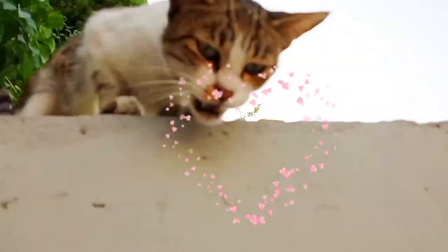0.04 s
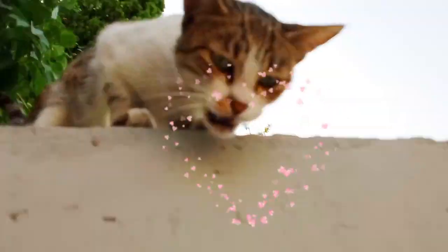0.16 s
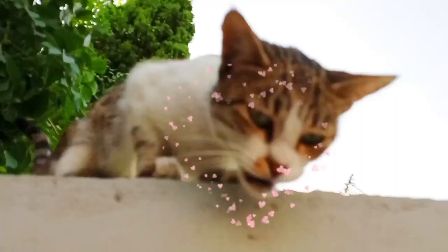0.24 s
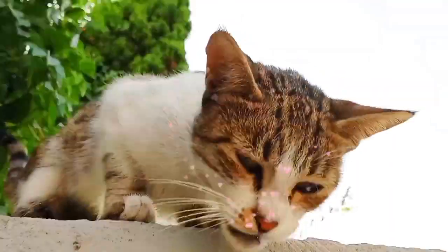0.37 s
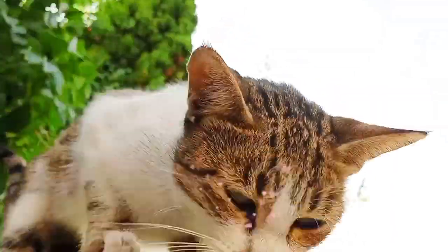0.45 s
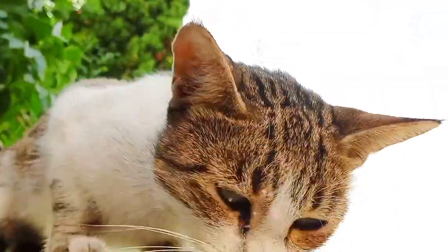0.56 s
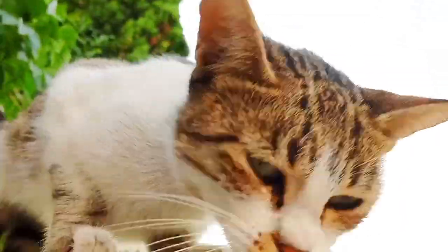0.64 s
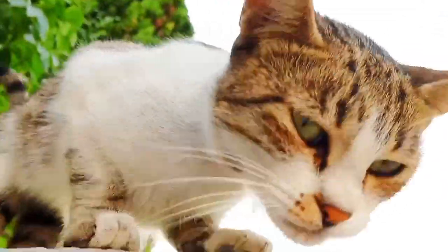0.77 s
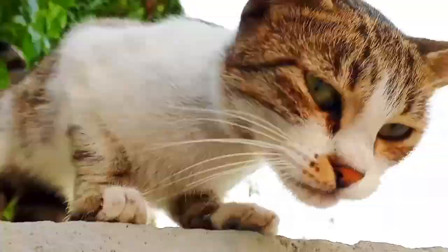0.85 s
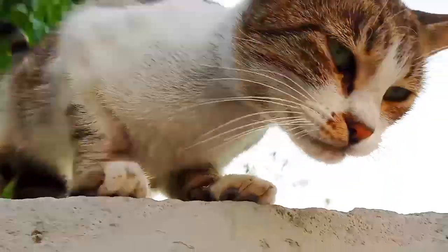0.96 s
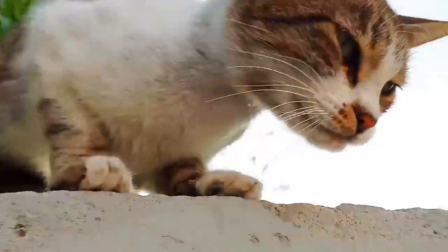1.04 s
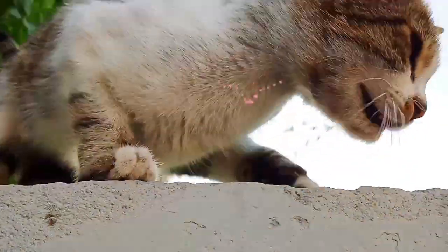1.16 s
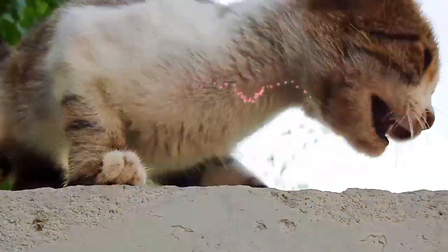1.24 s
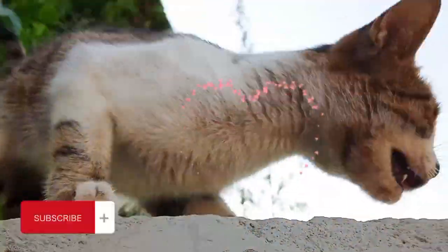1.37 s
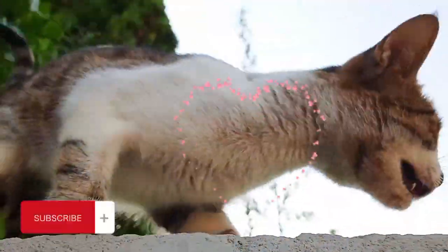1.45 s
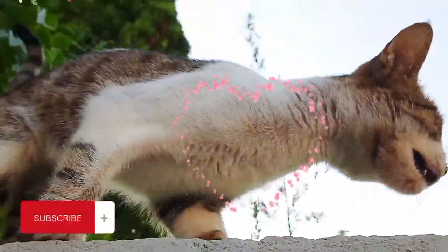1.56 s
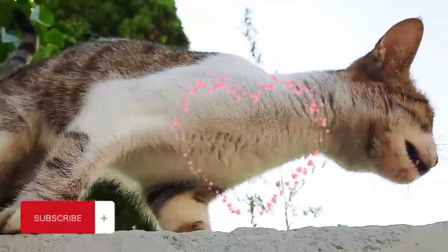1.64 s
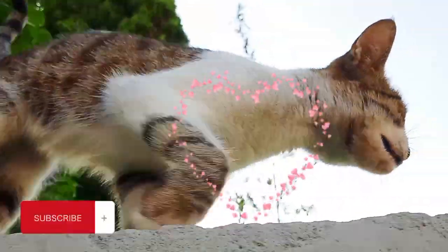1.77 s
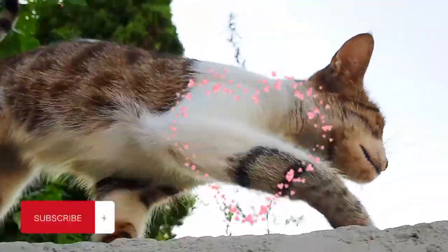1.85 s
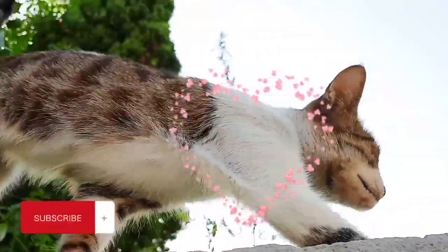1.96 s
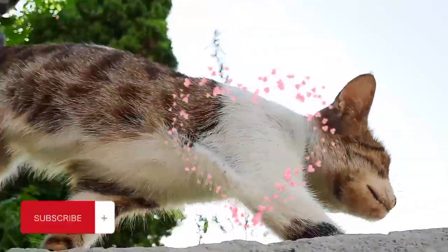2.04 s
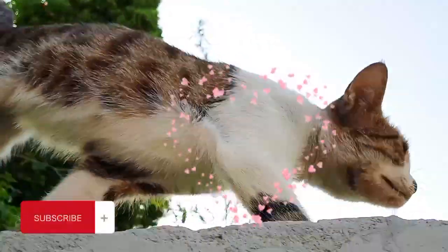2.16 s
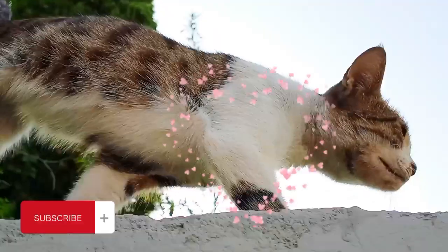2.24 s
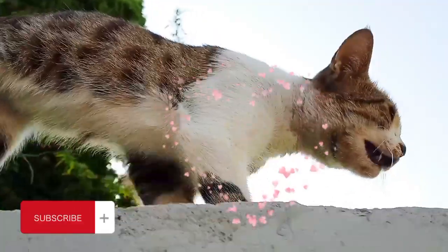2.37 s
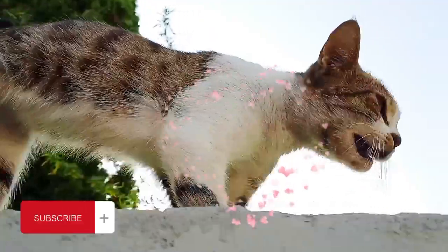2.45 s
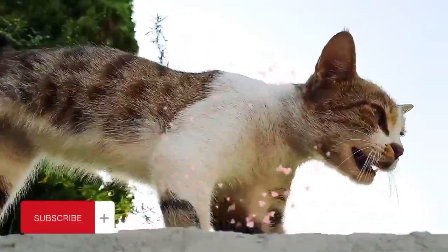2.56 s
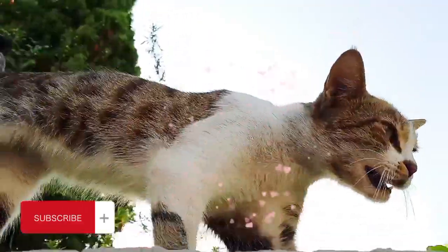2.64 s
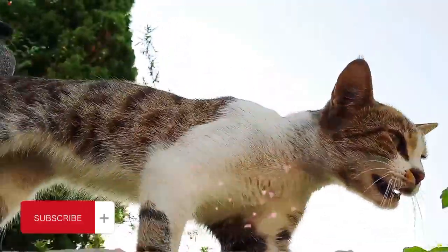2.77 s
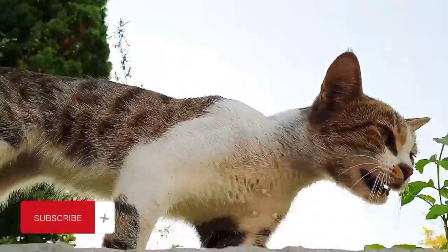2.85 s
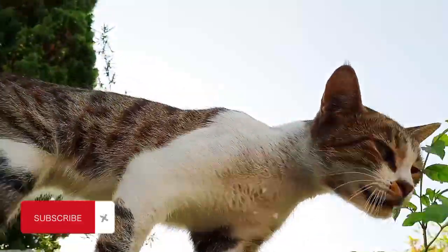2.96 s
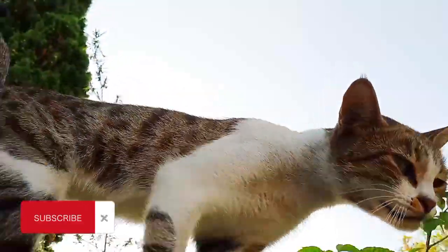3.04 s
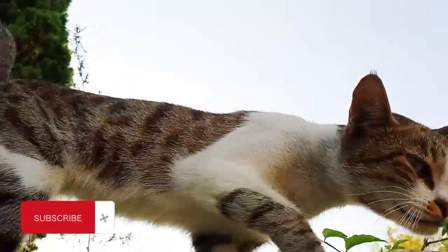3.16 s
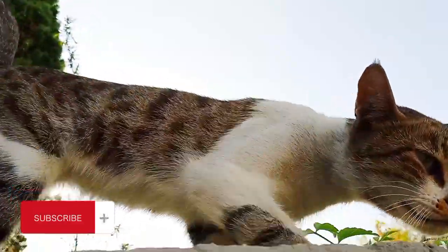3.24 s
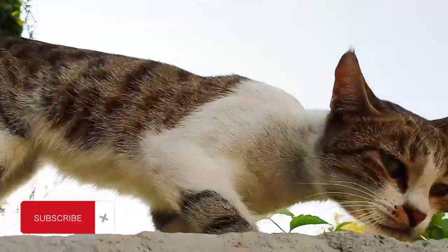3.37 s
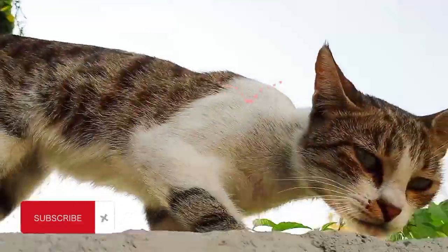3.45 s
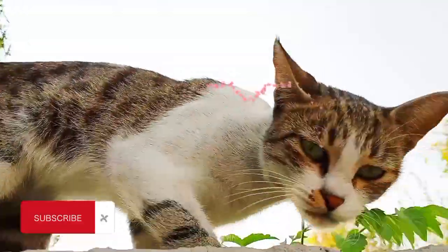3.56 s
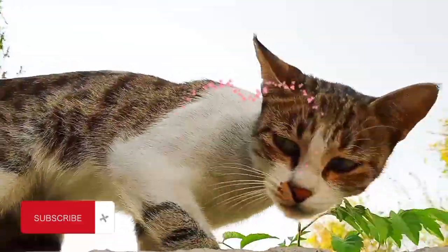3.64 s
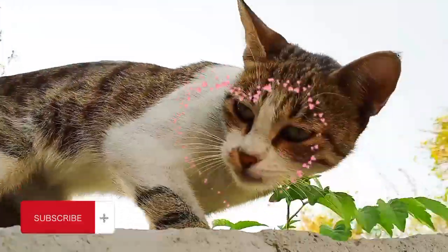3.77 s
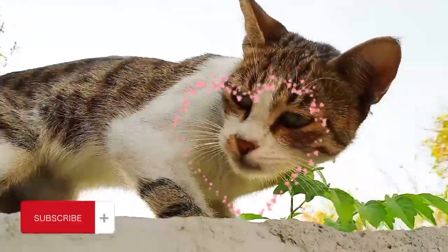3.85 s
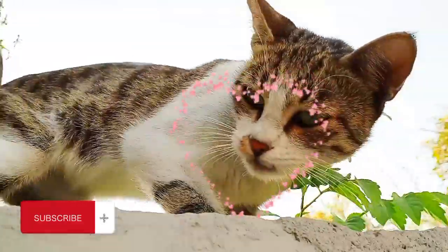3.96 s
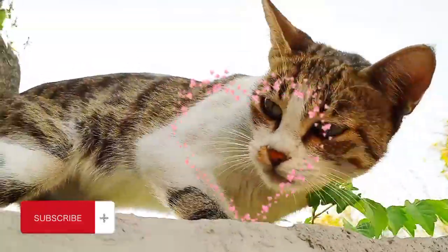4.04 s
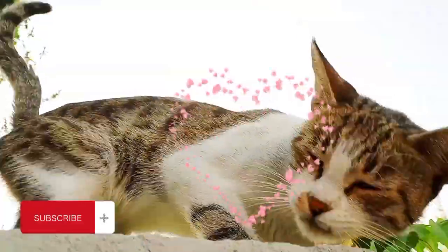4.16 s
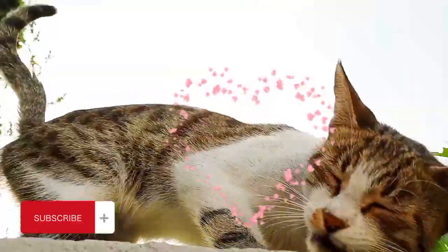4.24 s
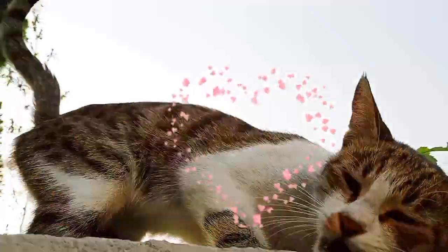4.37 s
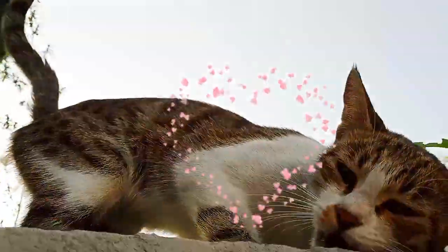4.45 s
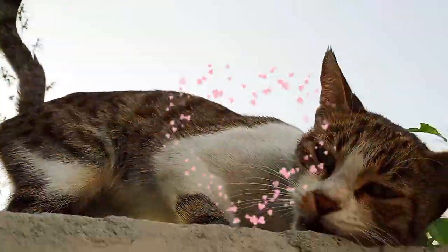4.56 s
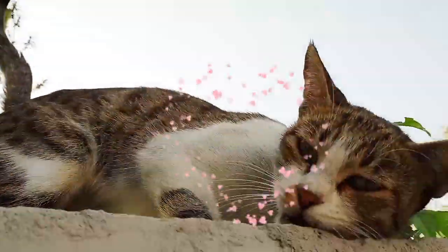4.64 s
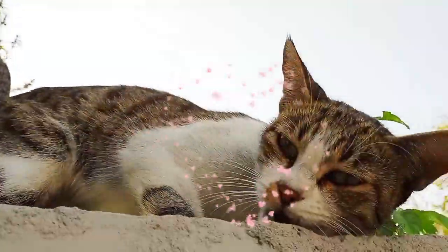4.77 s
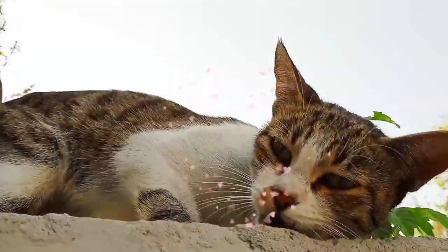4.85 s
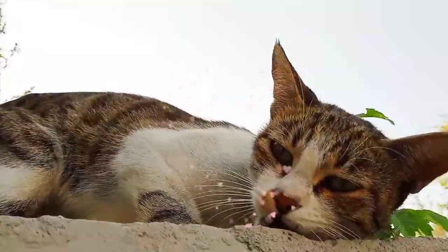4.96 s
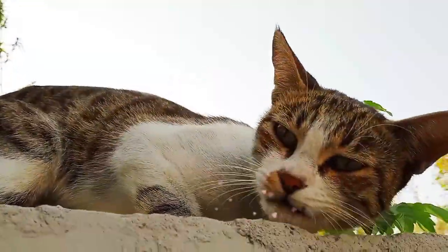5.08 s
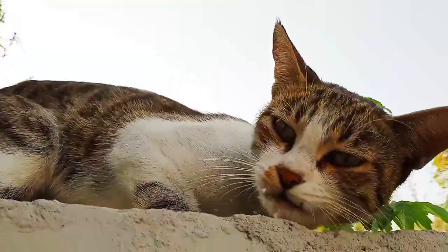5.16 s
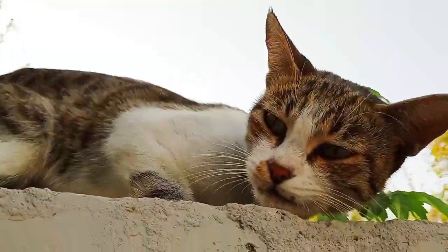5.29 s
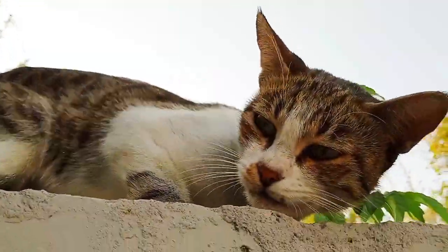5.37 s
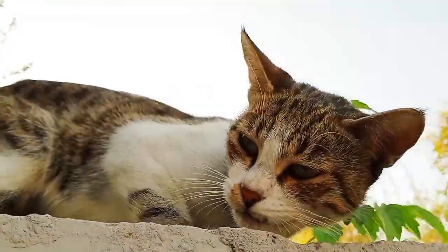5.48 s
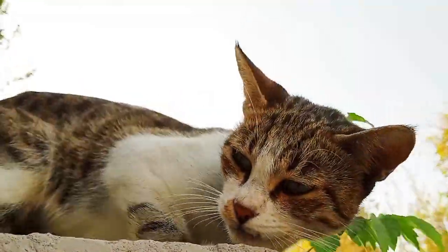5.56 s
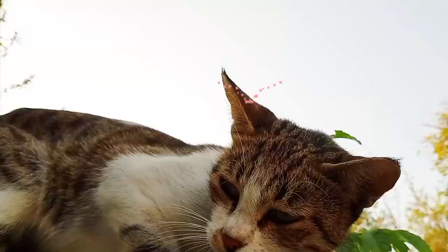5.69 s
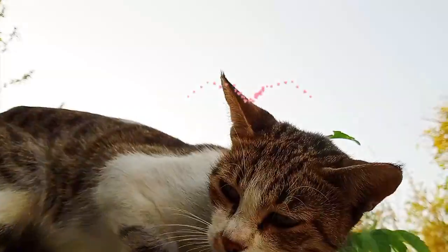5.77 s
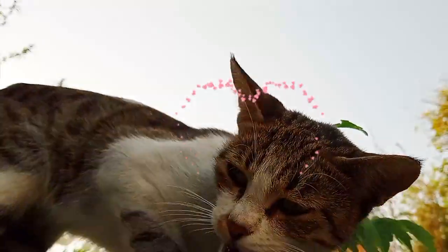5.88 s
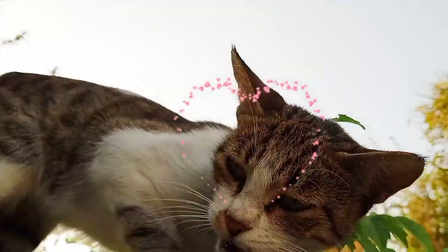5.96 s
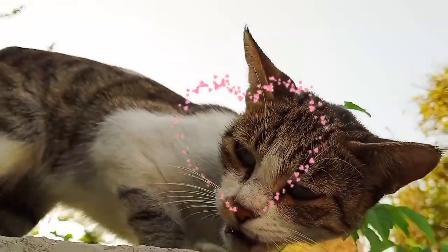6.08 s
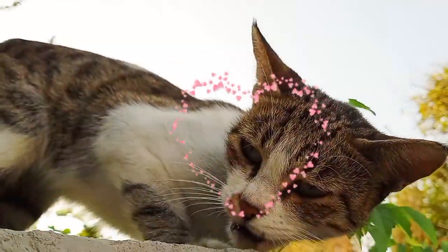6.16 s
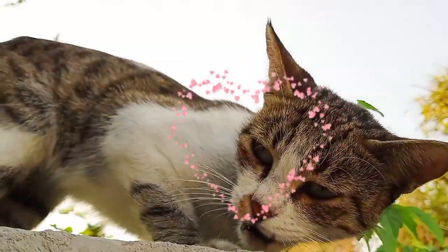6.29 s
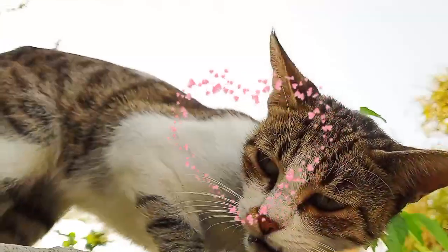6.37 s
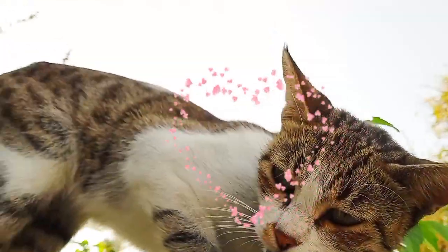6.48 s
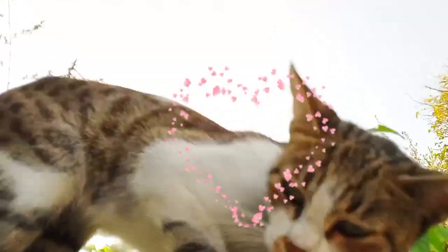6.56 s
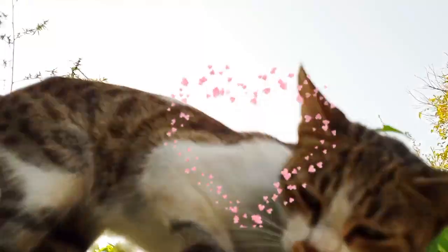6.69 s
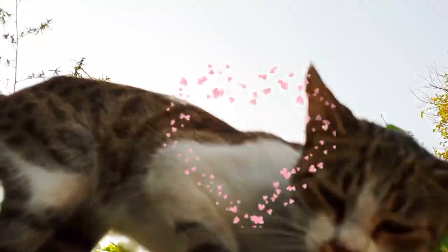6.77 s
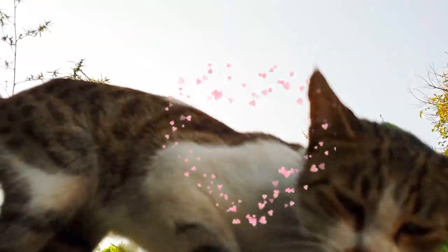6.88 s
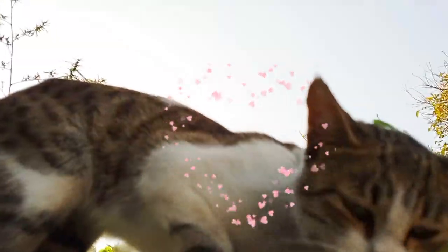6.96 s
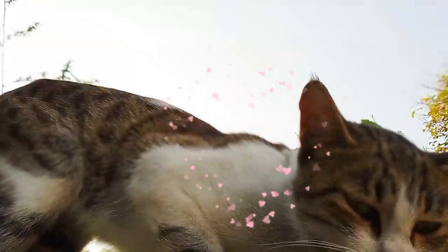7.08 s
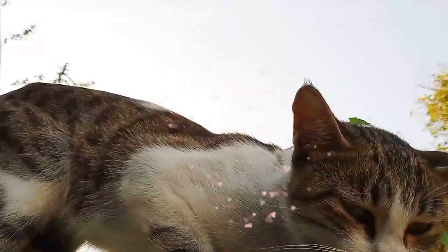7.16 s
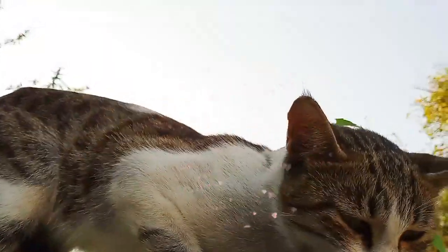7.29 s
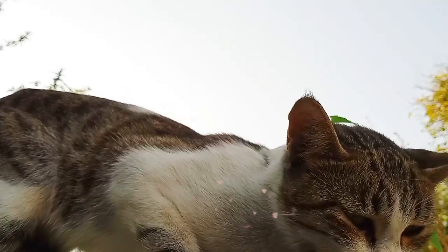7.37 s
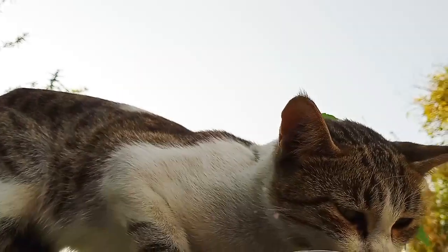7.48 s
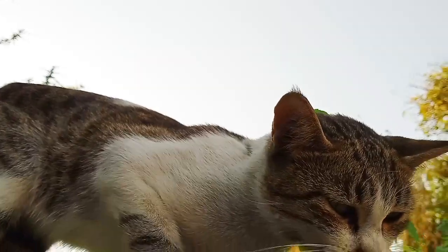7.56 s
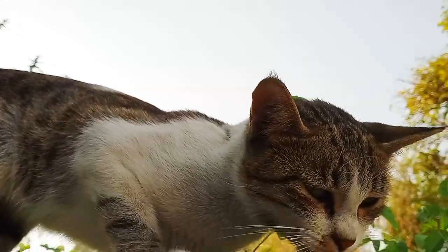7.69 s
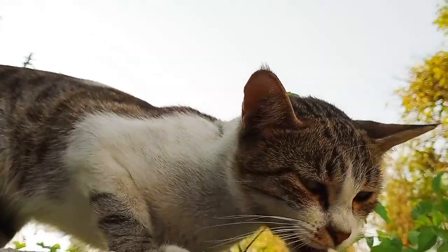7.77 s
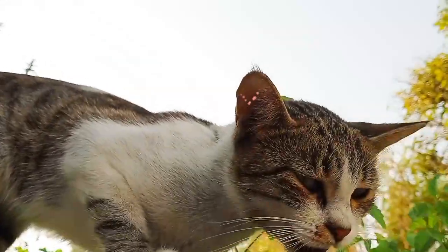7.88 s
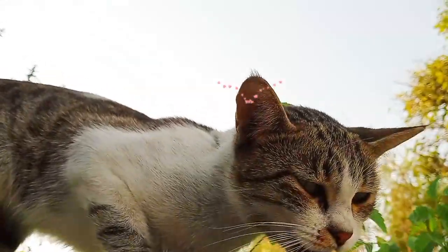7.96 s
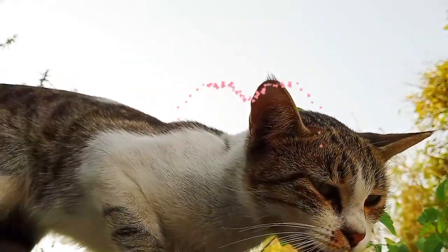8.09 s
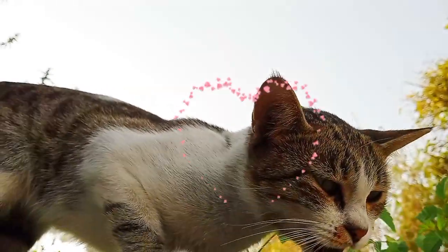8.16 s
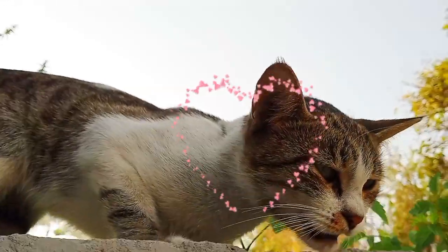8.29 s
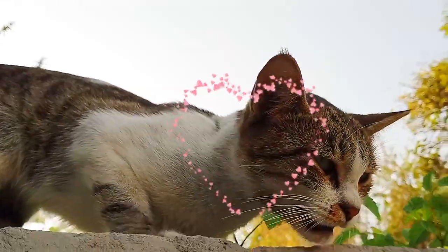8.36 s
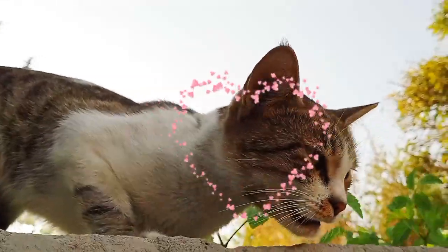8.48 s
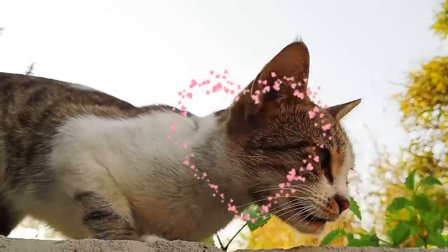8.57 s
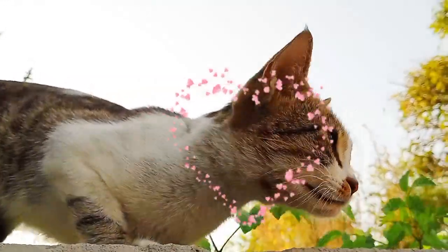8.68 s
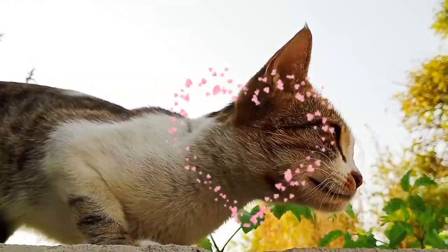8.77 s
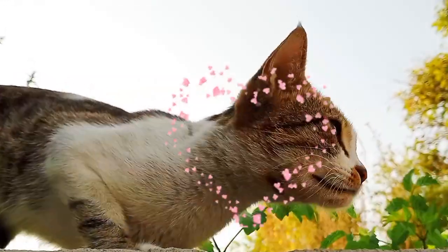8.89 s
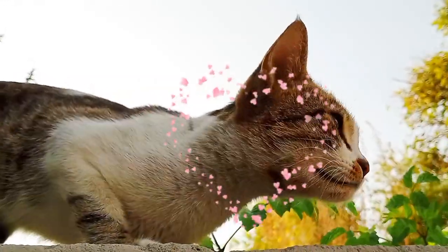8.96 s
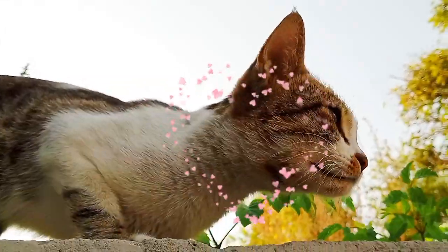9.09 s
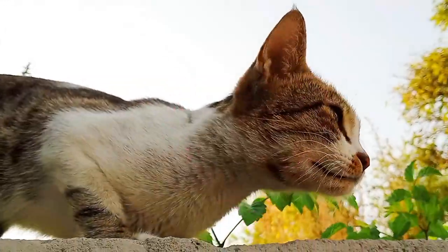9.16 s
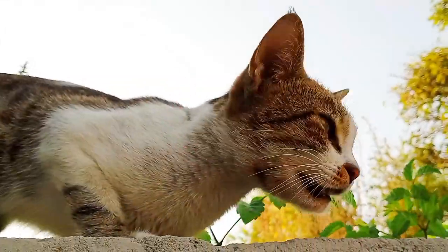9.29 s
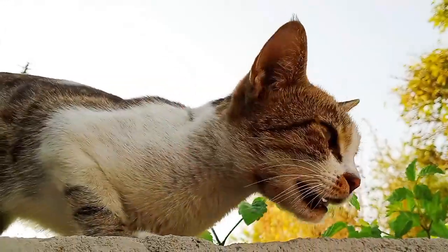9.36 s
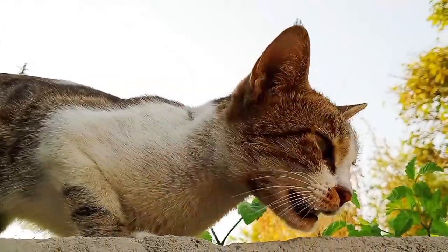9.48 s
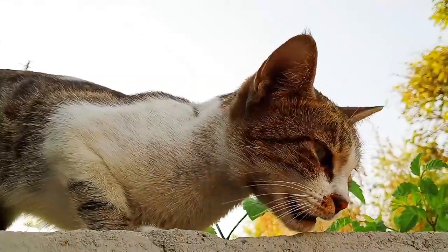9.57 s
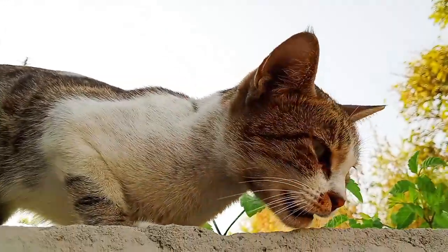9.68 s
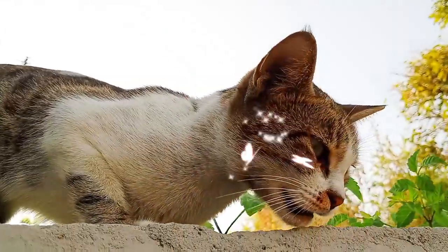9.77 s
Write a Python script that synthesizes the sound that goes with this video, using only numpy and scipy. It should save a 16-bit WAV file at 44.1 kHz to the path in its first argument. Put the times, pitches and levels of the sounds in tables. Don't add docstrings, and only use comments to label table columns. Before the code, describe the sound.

A quiet outdoor bed of shimmering cicadas, crickets and distant town hum runs throughout, heard by a hand-held phone. A near cat is already meowing at 0 s, strong and clear around 580 Hz, ending in a gulp and puff at 0.5; a sharp paw scrape and heavy casing thud hit at 0.34, with soft fur rubbing around them. Another knock and scratch come at 0.82, a quick scuff at 0.9. Meows follow at 1.2-1.8, 2.35-3.0 with a bright scratch at 2.7, 4.3-5.0 after tiny plastic ticks, 5.9-7.05, the longest and deepest sag, 7.8-8.65, loud and slowly closing, and 9.35-9.9, shorter. Most start bright and open, then turn rounder and lower. A hoarse crow caws at 4.97 and 9.41, with yard echo; very faint far caws at 3.3 and 8.6, and a tiny falling chirp at 7.3.

```python
import sys
import numpy as np
from scipy import signal
from scipy.fft import rfft, irfft, next_fast_len
from scipy.io import wavfile
from scipy.ndimage import uniform_filter1d

SR = 44100
rng = np.random.default_rng(int(sys.argv[2]) if len(sys.argv) > 2 else 0)


def master_out(mix):
    frames = np.transpose(np.atleast_2d(mix))
    ceiling = np.clip(frames, -1, 1)
    pcm = np.round(ceiling * 32767).astype(np.int16)
    wavfile.write(sys.argv[1], SR, pcm)


def boost(x):
    u = np.asarray(x, float) / 20
    return 10 ** u


N = 433503

# (frequency [Hz], density [dB per Hz])
TOWN = [(21, -59.5), (35, -26), (96, -2.5), (168, -8.5), (204, -2.5), (549, -12), (794, -13), (1170, -15.5),
        (1480, -16.5), (1720, -15), (2910, -9.5), (3600, -41.5), (4680, -65), (7920, -120)]
# (frequency [Hz], density [dB per Hz])
CICADAS = [(1940, -58), (3300, -5.5), (3760, -5.5), (4990, -13), (5910, 0.5), (6270, 6), (7150, 2.5),
           (8420, -29.5), (9350, -29.5), (11700, -17), (13500, -26.5), (15100, -12), (15800, -19)]
# (centre [Hz], width [Hz], level [dB])
DRONES = [(197.6, 4.5, -54), (213.95, 3.3, -49.5), (245, 3.5, -53), (791, 25, -56), (2919, 26, -52)]
# (centre [Hz], width [Hz], level [dB], pairs [per s], time of one pair [s])
SINGERS = [(5950, 650, -51.5, 11.6, 8.47), (7000, 500, -53, 13.3, 8.365)]

# (start [s], pitch overshoot [share], gulp [s], gulp level [dB], gulp pitch [Hz])
MEOWS = [
    (0, 0.0044, .482, -18, 397),
    (1.193, 0.08, 1.804, -28.5, 448),
    (2.345, 0.199, 2.996, -23, 425),
    (4.284, 0.018, 4.994, -18.5, 434),
    (5.897, .15, 7.039, -18, 410),
    (7.802, 0.31, 8.631, -21, 404),
    (9.337, 0.21, 9.9, -20, 420),
]
# (time [s], pitch [Hz])
PITCH = [
    [(0.005, 576.7), (0.045, 577), (0.181, 586.6), (0.327, 583.7), (0.331, 582.3), (0.421, 571.4),
     (0.441, 547), (0.478, 490)],
    [(1.215, 596), (1.225, 595.6), (1.308, 618), (1.347, 606.4), (1.385, 584.7), (1.561, 634.5),
     (1.639, 643), (1.761, 588), (1.803, 541)],
    [(2.375, 581), (2.409, 584.4), (2.439, 581), (2.497, 578), (2.557, 560), (2.689, 588.2), (2.939, 561),
     (2.992, 510)],
    [(4.295, 540), (4.338, 596), (4.46, 601), (4.53, 586), (4.6, 602), (4.66, 590.4), (4.808, 593),
     (4.84, 572.5), (4.985, 511)],
    [(5.925, 623), (5.945, 595), (6.035, 633.4), (6.165, 598.6), (6.537, 575), (6.781, 508.7),
     (6.957, 494.6), (7.032, 470)],
    [(7.83, 588.6), (7.884, 584.6), (8.082, 598), (8.092, 584.5), (8.304, 585.6), (8.456, 555.5),
     (8.606, 508), (8.628, 489)],
    [(9.36, 619), (9.374, 612.5), (9.394, 576.4), (9.436, 576.8), (9.45, 560), (9.462, 574.4), (9.49, 562),
     (9.825, 542.7)],
]
# (first [s], spacing [s], count, depth [share of pitch])
QUAVERS = [(1.216, .066, 2, 0.017), (1.323, .03, 1, 0.024), (2.378, 0.055, 2, 0.025),
           (4.372, .057, 1, 0.025), (4.858, .03, 2, 0.047), (4.948, .03, 1, .05), (5.912, .04, 1, 0.067),
           (6.073, 0.031, 2, 0.018), (6.77, .033, 3, 0.032), (6.969, .03, 1, 0.027)]
# (time [s], effort [dB], first resonance [Hz], second resonance [Hz])
MOUTH_FIRST = [
    [(0.0, -31, 2120, 4060), (0.17, -29, 2130, 4070), (0.263, -25.5, 1930, 2530), (0.378, -27, 1890, 2230),
     (0.386, -34.5, 1400, 2310), (0.428, -46.5, 1190, 2150), (0.482, -45.5, 880, 1950)],
    [(1.201, -46.5, 1088, 3940), (1.292, -36, 2250, 3970), (1.377, -30, 2480, 2790),
     (1.445, -27.5, 2400, 2150), (1.527, -35.5, 2100, 3620), (1.535, -48, 1100, 1920),
     (1.653, -42, 980, 1910), (1.805, -49, 962, 1830)],
    [(2.354, -50.5, 1930, 4080), (2.435, -37, 2484, 3930), (2.549, -33.5, 2330, 1820),
     (2.64, -30.5, 2460, 2040), (2.653, -36.5, 1480, 2340), (2.8, -39.5, 1470, 2370),
     (2.824, -49, 1080, 2300), (2.917, -44.5, 1016, 2263), (2.996, -47.5, 895, 2235)],
]
MOUTH_LATER = [
    [(4.306, -48.5, 1120, 2760), (4.323, -32, 1766, 3600), (4.334, -44.5, 2028, 4080),
     (4.51, -30, 2100, 4080), (4.658, -28, 1894, 3260), (4.665, -35, 1490, 2324),
     (4.757, -39.5, 1407, 2190), (4.898, -43, 1220, 2290), (4.997, -41, 1270, 2310)],
    [(5.9, -40, 1880, 4090), (5.953, -31.5, 2137, 4070), (6.062, -36, 1950, 3800),
     (6.184, -32.5, 1560, 4120), (6.191, -46.5, 1136, 1810), (6.368, -49, 1140, 1770),
     (6.559, -48.5, 1120, 1800), (6.787, -45, 1120, 1907), (7.045, -41.5, 1082, 1920)],
    [(7.806, -43, 1850, 4090), (7.817, -33.5, 1870, 3990), (7.896, -33, 1912, 2440),
     (8.065, -26, 1785, 3240), (8.108, -26.5, 1790, 2980), (8.186, -29, 1760, 2620),
     (8.194, -30.5, 1590, 2180), (8.367, -36, 1500, 2290), (8.639, -40.5, 1180, 2274)],
    [(9.342, -45, 1770, 4090), (9.357, -38.5, 1906, 4090), (9.388, -39, 1820, 3500),
     (9.403, -37, 1800, 2230), (9.515, -34.5, 1750, 2240), (9.635, -30.5, 1810, 2840),
     (9.706, -30, 1350, 2490), (9.757, -34, 1320, 2050), (9.828, -38, 1190, 2370)],]
# (time [s], level [dB])
HOLLOW = [
    [(0, -12), (.2, -1.5), (.39, -1), (.42, 3), (.48, .1)],
    [(1.2, 5), (1.3, -5), (1.4, 1), (1.55, 4), (1.65, 2.5), (1.8, -0.5)],
    [(2.35, -2), (2.5, 1.5), (2.6, 0.5), (2.7, 1.5), (2.85, 1.8), (2.99, 2)],
    [(4.3, 9), (4.4, -13), (4.55, 1.5), (4.7, -0.5), (4.8, 2), (4.98, 2)],
    [(5.9, 1), (6.2, .1), (6.45, 2.5), (6.6, 6.5), (6.75, 3.5), (6.9, 0.5), (7.04, 0.5)],
    [(7.81, 1), (8.0, 3.3), (8.2, 2.2), (8.38, -4.5), (8.5, -5.5), (8.63, 0.5)],
    [(9.34, -6), (9.39, 0), (9.5, -0.5), (9.65, -0.5), (9.82, .1)],
]
# (time [s], brightness [dB], third resonance [Hz], its level [dB])
TONGUE_FIRST = [
    [(0, -47.5, 3480, -34), (.09, -46.5, 3580, -31), (.103, -61, 3500, -34), (.2, -62, 3400, -40),
     (.27, -53, 3250, -27), (.33, -48, 3500, -34.5), (.39, -55, 3089, -31), (.48, -72, 2800, -54)],
    [(1.2, -48, 3560, -38), (1.29, -51, 3900, -37), (1.35, -40.5, 4000, -33), (1.42, -43.5, 3660, -29.5),
     (1.48, -46.5, 3400, -32), (1.54, -57, 3030, -38), (1.66, -60, 3114, -42), (1.8, -61, 2940, -46)],
    [(2.35, -61, 3970, -46), (2.45, -59, 3730, -36.5), (2.57, -48, 3400, -30), (2.64, -49, 3480, -31.5),
     (2.69, -50, 3230, -37), (2.8, -57, 3165, -42), (2.99, -60, 3100, -51)],
]
TONGUE_MIDDLE = [
    [(4.29, -45, 3550, -31), (4.324, -50, 3600, -34), (4.345, -50.5, 3600, -48), (4.52, -47.5, 3600, -36),
     (4.58, -49, 3550, -38.5), (4.64, -56, 3100, -44), (4.72, -61, 3000, -57), (4.98, -60.5, 2900, -47)],
    [(5.9, -54, 3700, -54), (5.96, -48, 3600, -37), (6.03, -53, 3150, -39), (6.11, -53, 3050, -38),
     (6.19, -57, 3000, -60), (6.32, -57.5, 2950, -59), (6.6, -65, 2800, -44), (6.87, -66, 2500, -38.5),
     (7.04, -51, 2400, -35)],
]
TONGUE_LAST = [
    [(7.81, -46, 3660, -43), (7.92, -44, 3520, -39), (8.0, -48, 3240, -38), (8.07, -51.5, 3200, -41),
     (8.14, -52, 2950, -41), (8.34, -55, 2850, -41.5), (8.48, -60, 2820, -42), (8.63, -69, 2600, -71)],
    [(9.35, -69, 3600, -43), (9.41, -61, 3230, -29.5), (9.5, -38, 3150, -34), (9.62, -46, 2800, -35),
     (9.7, -44, 2760, -36), (9.78, -51, 2700, -43)],
]
# (hum through the nose [dB], its change as the jaw shuts [dB],
# tilt of the upper partials [dB per kHz], ring between the teeth [dB])
TONE = [(-30.5, 7, 13, -32), (-29.5, -10, 0, 6.5), (-34, 0.5, 0, -5), (-27, 1.5, -0.5, -5),
        (-24.5, -1, 0, 6), (-28, -0.5, 1, -3.5), (-30, 3, 1.5, -3)]
FOLDS_DB = [-1.6, 5, -2.5, -5.5]
# (frequency [Hz], gain [dB])
UPPER = [(2500, -6.5), (2950, -2.5), (3550, -1), (4150, -0.5), (4750, -1.5), (5300, -1), (6000, -2),
         (7200, -11), (8800, -42.5), (10000, -16.5), (10750, -11.5), (11500, -27), (13800, -32.5),
         (15200, -20.5)]
# (frequency [Hz], gain [dB])
UPPER_NARROW = [(2000, -1.5), (2600, 4.5), (3000, -9.5), (3400, -8.5), (3900, -8), (4500, 4.5),
                (5200, -4.5), (7000, -3), (8800, -39)]

# (time [s], peak [dB], ring
# [Hz])
THUDS = [(0.131, -37, 245), (0.217, -29.5, 116), (0.251, -34.5, 200), (0.282, -42, 110),
         (0.344, -18.5, 315), (0.818, -24, 323), (0.821, -30, 1550), (1.021, -38.5, 246), (3.121, -38, 158),
         (4.427, -42, 2050), (4.463, -35, 2050), (9.338, -29, 1700)]
# (loudest [s], level [dB], rise [dB per s], fall [dB per s])
SCUFFS = [
    (.14, -35.5, 25, 34),
    (.3, -31, 84.5, 93),
    (.341, -16.5, 2500, 1405),
    (.375, -28, 100, 351.5),
    (.92, -35, 350, 76),
    (1.1, -50, 18, 98),
    (2.0, -45, 60, 59),
]
# (frequency [Hz], gain [dB])
PLASTER = [(150, -1.5), (400, 1.5), (900, -12.5), (1450, -2), (2000, -0.5), (3000, -5.5), (4200, -14),
           (6000, -12.5), (8600, -29), (11800, -15.5), (13500, -26), (15000, -19)]
# (time [s], level [dB], length [s], lip whistle [dB])
PUFFS = [
    (2.35, -39, 0.0154, -11),
    (5.901, -31.5, 0.018, -5),
    (7.8, -37, 0.016, -9),
    (9.343, -40, .012, -10),
    (0.478, -27.5, 0.032, 7.5),
    (2.994, -38.5, 0.044, -4),
    (7.035, -28, 0.05, -1),
    (8.631, -30.5, 0.044, 3.5),
]
# (centre [Hz], width [Hz], level [dB])
OPEN_MOUTH = [(2480, 540, 5), (4530, 650, -5.5), (10700, 230, -16.5), (12500, 900, -33.5), (1320, 510, -8)]
# (time [s], level [dB], t60 [s], treble [dB])
RATTLES = [
    (.818, -26.5, 0.11, -4),
    (2.694, -26, 0.08, 7),
    (3.12, -36.5, 0.1, 1),
    (5.84, -39, .02, 5),
    (7.762, -39, .03, 3),
    (9.295, -35.5, .015, -11),
]
# (frequency [Hz], gain [dB])
CASING = [(150, -33), (400, -2), (800, -0.5), (1500, -5), (2800, -5.5), (4500, -15.5), (7000, -28),
          (8700, -45), (11500, -30), (15800, -37)]
# (time [s], peak [dB], ring [Hz])
TICKS = [(0.9996, -44, 12000), (4.1728, -41, 10300), (1.18, -46, 11000), (4.2026, -32, 12500),
         (4.247, -46, 12300), (4.2514, -39, 11500), (4.2744, -47, 12000), (4.2944, -35, 10800),
         (4.351, -42, 10500)]

# (start [s], length [s], effort [dB], top pitch of one syrinx side [Hz], top tone of the other [Hz])
CAWS = [
    (4.969, .272, -19.5, 475, 1550),
    (9.412, .345, -23.5, 490, 1360),
    (3.33, .31, -48, 490, 1480),
    (8.62, .23, -47, 500, 1530),
]
# (frequency [Hz], gain [dB])
BEAK = [(300, -66), (600, -38), (800, -27), (960, -15.5), (1200, -13), (1450, -6), (1900, -1), (2350, -7),
        (2750, -21.5), (3750, -15), (4700, -22.5), (5800, -14.5), (8700, -38), (11700, -30), (13500, -49),
        (15300, -38)]
# (frequency [Hz], gain [dB])
CROW_WALLS = [(900, -6.5), (1400, -3.5), (1950, 2.5), (2500, -5.5), (4000, -3.5), (8000, -0.5)]
# (frequency [Hz], t60 [s])
YARD = [(1000, .4), (2000, .62), (4000, .45), (12000, .2)]

SETTLE_S, CLOSE_S = .012, 0.016


def add(mix, s, sound):
    part = mix[max(round(s * SR), 0):][:len(sound)]
    part += sound[:len(part)]


def evened(x):
    return x / np.sqrt(np.mean(x ** 2) + 1e-20)


def read(points, hz):
    f, value = np.transpose(points)
    return np.interp(np.log(hz + 1), np.log(f + 1), value)


def along(rows, t):
    s, *columns = np.transpose(rows)
    return [np.interp(t, s, c) for c in columns]


def smooth(x, size):
    return uniform_filter1d(x, size=size, mode="nearest")


def wander(size, hz):
    lead = round(2 * SR / hz)
    noise = rng.standard_normal(size + lead)
    return evened(signal.sosfilt(signal.butter(2, hz, fs=SR, output="sos"), noise)[lead:])


def coloured(x, points):
    size = next_fast_len(len(x) + 2048)
    gain = boost(read(points, np.fft.rfftfreq(size, 1 / SR)))
    return irfft(rfft(x, size) * gain, size)[:len(x)]


def resonate(x, hz, width):
    return signal.lfilter(*signal.iirpeak(hz, hz / width, SR), x)


def band(x, hz, width):
    return evened(resonate(resonate(x, hz, width), hz, width))


def whistle(s, length, db, from_hz, to_hz, loudest, rise_db, fall_db, blur_hz, steady=0):
    u = np.arange(0, 1, 1 / (length * SR))
    level_db = db + np.interp(u, [0, loudest, 1], [rise_db, 0, fall_db])
    turns = np.cumsum(from_hz + (to_hz - from_hz) * u) / SR
    return s, boost(level_db) * (steady + wander(len(u), blur_hz)) * np.sqrt(2) * np.sin(2 * np.pi * turns)


def wash(points, db, patchy_db, swell_db, flicker_db):
    frames, hz = N // 256 + 5, np.fft.rfftfreq(1024, 1 / SR)
    a, b, patches = rng.standard_normal((frames, 513, 3)).T
    patches = uniform_filter1d(patches, size=12, axis=0)
    patches = evened(uniform_filter1d(patches, size=14, axis=1))
    swell, flicker = wander(frames, 0.5 * 256), wander(frames, 12.0 * 256)
    level_db = read(points, hz)[:, None] + patchy_db * patches + swell_db * swell + flicker_db * flicker
    z = (a + 1j * b) * boost(level_db)
    return boost(db) * evened(signal.istft(z, nperseg=1024, noverlap=768)[1][:N])


def drones():
    return sum(boost(db + 2.57 * wander(N, 2.305)) * band(rng.standard_normal(N), hz, width)
               for hz, width, db in DRONES)


def singer(hz, width, db, rate, at_s):
    pair_s, beat_s = .024, .0075
    t = np.arange(N) / SR
    since = ((t - at_s + .03) * rate + .05 * wander(N, .5)) % 1 / rate - .03
    beats = np.exp(-(since / beat_s) ** 2) + np.exp(-((since - pair_s) / beat_s) ** 2)
    buzz = beats * resonate(resonate(rng.standard_normal(N), hz, width), hz, width)
    return boost(db + 3 * wander(N, 1.5)) * evened(buzz)


def ring(hz, centre_hz, sharp):
    hasty_hz_per_s, bluntest = 14000, 3.2
    speed = uniform_filter1d(abs(np.gradient(centre_hz + 0 * hz)) * SR, size=260)
    sharp = np.maximum(sharp / (1 + (speed / hasty_hz_per_s) ** 2), min(sharp, bluntest))
    return 1 / (1 - (hz / centre_hz) ** 2 + 1j * hz / centre_hz / sharp)


def gulp(t, db, hz):
    rise_s, hold_s, fall_db_per_s, sag = 0.004, 0.016, 1800, 0.14
    level = np.clip(t / rise_s, 0, 1) * boost(db - fall_db_per_s * np.maximum(t - hold_s, 0))
    return level, hz * (1 + sag * (1 - t / hold_s).clip(-1, 1))


def fold_pitch(t, pitch, kick, gulp_s, gulp_hz):
    (hz,) = along(pitch, t)
    sags = 0
    for at, gap, count, share in QUAVERS:
        for k in range(round(count)):
            sags = sags + share * np.exp(-((t - at - k * gap) / 0.00558) ** 2)
    hz = hz * (1 + kick + .003 * wander(len(t), 33.8) - sags)
    return hz + np.clip((t - gulp_s) / CLOSE_S + 0.61, 0, 1) ** 2 * (gulp_hz - hz)


def low_partials(t, hz, mouth, hollow, nose_db):
    (effort_db, first_hz, second_hz), (hollow_db,) = along(mouth, t), along(hollow, t)
    gains = []
    for k, db in enumerate(FOLDS_DB, 1):
        second = -0.36 * boost(hollow_db) * ring(k * hz, second_hz, 18.4)
        oral = boost(effort_db + db) * (ring(k * hz, first_hz, 10.9) + second)
        nasal = boost(nose_db) * ring(k * hz, 429, 1.15) * np.exp(2.95j)
        gain = oral + nasal
        phase = smooth(np.unwrap(np.angle(gain)), 1500)
        gains.append(smooth(abs(gain), 280) * np.exp(1j * phase))
    return gains


def upper_partials(t, hz, tongue, shut, tilt_db, teeth_db, soft_db):
    bright_db, third_hz, third_db = along(tongue, t)
    gains = []
    for k in range(5, 26):
        partial_hz = k * hz
        mouth_db = (2 - shut) * read(UPPER, partial_hz) + shut * read(UPPER_NARROW, partial_hz)
        source_db = bright_db + tilt_db * (np.minimum(k * hz / 1000, 8) - 5.5)
        source_db = source_db + teeth_db * (k * hz.mean() > 9300)
        third = boost(third_db) / (1 + ((partial_hz - third_hz) / 210) ** 2)
        gains.append((boost(source_db + mouth_db) + third) * boost(-soft_db) * np.exp(1j * k * k))
    return gains


def meow(row, pitch, mouth, hollow, tongue, tone):
    (s, overshoot, gulp_s, gulp_db, gulp_hz), (nose_db, snap_db, tilt_db, teeth_db) = row, tone
    t = np.arange(s, gulp_s + 3 * CLOSE_S, 1 / SR)
    kick = overshoot * np.exp((s - t) / SETTLE_S)
    gulp_level, gulp_hz = gulp(t - gulp_s, gulp_db, gulp_hz)
    hz = fold_pitch(t, pitch, kick, gulp_s, gulp_hz)
    turns = np.cumsum(hz) / SR

    gape_hz = along(mouth, t)[1]
    gape_hz = smooth(np.maximum.accumulate(gape_hz[::-1])[::-1], 900)
    shut = np.clip((1650 - gape_hz) / 450, 0, 1)
    soft_db = 900 * np.maximum(s + .03 - t, 0) * (s > 0) + 700 * np.maximum(t - gulp_s + .03, 0)
    gains = low_partials(t, hz, mouth, hollow, nose_db + 48.5 * kick + snap_db * shut)
    gains += upper_partials(t, hz, tongue, shut, tilt_db, teeth_db, soft_db)

    voice = 0
    for k, gain in enumerate(gains, 1):
        shimmer = boost(.11 * min(k, 14) ** 1.588 * wander(len(t), 25.6))
        voice = voice + shimmer * np.sqrt(2) * (gain * np.exp(2j * np.pi * k * turns)).real
    air = boost(-30) * wander(len(t), 400) * voice
    attack_s = 0.0011 if overshoot > .1 or s == 0 else .03
    closing = np.maximum(t - gulp_s + CLOSE_S / 4, 0) / CLOSE_S
    call = (voice + air) * np.clip((t - s) / attack_s, 0, 1) * boost(-11 * closing)
    swallow = gulp_level * np.sqrt(2) * np.cos(2 * np.pi * turns + np.angle(gains[0]))
    return s, (call + swallow) * np.minimum((t[-1] - t) / .004, 1)


def thud(s, db, hz):
    t = np.arange(.06 * SR) / SR
    blow = 4.35 * boost(db - 60 * t / 0.025) * np.sin(2 * np.pi * hz * t) * np.minimum(t / 0.00059, 1)
    return s, signal.sosfilt(signal.butter(2, 70, "high", fs=SR, output="sos"), blow)


def scuff(s, db, rise, fall):
    t = np.arange(max(-25 / rise, -s), 25 / fall, 1 / SR)
    uneven_db = 2.0 * wander(len(t), 104) + 1.2 * wander(len(t), 25)
    grit = rng.standard_normal(len(t)) * boost(uneven_db)
    return s + t[0], boost(db + np.minimum(rise * t, -fall * t)) * evened(coloured(grit, PLASTER))


def wall_rub():
    return whistle(s=.14, length=.26, db=-25, from_hz=1420, to_hz=1500,
                   loudest=0.63, rise_db=-12.5, fall_db=-7, blur_hz=110.9)


def claw_squeak():
    return whistle(s=.19, length=.18, db=-31, from_hz=3600, to_hz=4450,
                   loudest=0.43, rise_db=-26, fall_db=-12, blur_hz=132.0)


def puff(s, db, length, lips_db):
    t = np.arange(.2 * SR) / SR
    hiss = rng.standard_normal(len(t)) * boost(wander(len(t), 96.5))
    modes = OPEN_MOUTH + [(6440, 430, lips_db)]
    mouth = sum(boost(mode_db) * band(hiss, hz, width) for hz, width, mode_db in modes)
    return s, boost(db - 15 * t / length) * np.minimum(t / (0.33 * length), 1) * mouth


def rattle(s, db, t60, treble_db):
    t = np.arange(.08 * SR) / SR
    grains = rng.standard_normal(len(t)) * boost(2.1 * wander(len(t), 357.0))
    grains = coloured(evened(coloured(grains, CASING)), [(1800, 0.0013), (3500, treble_db)])
    return s, boost(db - 60 * np.maximum(t - .008, 0) / t60) * np.minimum(t / 0.00086, 1) * grains


def tick(s, db, hz):
    t = np.arange(.005 * SR) / SR
    snap = rng.standard_normal(len(t)) * boost(db - 60 * t / 0.0045)
    return s, resonate(snap, hz, 5000) * 3.0


def arch(t, length, top_s):
    return (2 * (t / length) ** (np.log(.5) / np.log(top_s / length)) - 1) ** 2


def caw(s, length, effort_db, top_hz, side_top_hz):
    rough, jitter = .26, .022
    t = np.arange(0, length, 1 / SR)
    size = len(t)
    hz = top_hz * (1 - .19 * arch(t, length, .12) ** 1.7)
    side_hz = side_top_hz * (1 - .23 * arch(t, length, .078))
    edge = np.maximum(1 - np.minimum(t, length - t) / (0.055 * length), 0)
    effort_db = effort_db - 12.5 * edge - 48 * t * t
    turns = np.cumsum(hz * (1 + jitter * wander(size, 50))) / SR
    tones = sum(np.cos(2 * np.pi * k * turns + k * k) / (1 + (k / 10) ** 2) for k in range(1, 15))
    side_turns = np.cumsum(side_hz * (1 + .6 * jitter * wander(size, 50))) / SR
    side = boost(3.5) * np.cos(2 * np.pi * side_turns)
    rasp_turns = np.cumsum(hz / 5 * (1 + .15 * wander(size, 40))) / SR
    rasp = np.exp(.3 * np.cos(2 * np.pi * rasp_turns) + .1 * wander(size, 120))
    hiss = 10.0 * coloured(rng.standard_normal(size), [(2300, -11), (3000, 0)])
    hiss = hiss * boost(-3 * (t / length - 1.08))
    drive = (1 - rough) * rasp * (tones + side) + rough * np.sqrt(rasp) * hiss
    return s, boost(effort_db) * evened(coloured(drive, BEAK))


def bird():
    return whistle(s=7.31, length=0.08, db=-59, from_hz=4450, to_hz=4050,
                   loudest=.4, rise_db=-5, fall_db=-8, blur_hz=20.0, steady=3)


def yard(x):
    taps = np.zeros(SR)
    at = np.arange(500, SR - 20, 20) + rng.integers(0, 20, (SR - 501) // 20)
    taps[at] = rng.choice([-1., 1.], len(at))
    hz, t, z = signal.stft(taps, SR, nperseg=256)
    tail = signal.istft(z * boost(-60 * t / read(YARD, hz)[:, None]), SR, nperseg=256)[1]
    return signal.fftconvolve(x, tail / np.linalg.norm(tail))[:N]


def scene():
    cat, crows, near = np.zeros((3, N))
    air = wash(TOWN, -42, patchy_db=1.3, swell_db=0.21, flicker_db=0.56)
    air += wash(CICADAS, -44.5, patchy_db=1.3, swell_db=.4, flicker_db=1.1)
    air += drones() + sum(singer(*row) for row in SINGERS)
    mouths = MOUTH_FIRST + MOUTH_LATER
    tongues = TONGUE_FIRST + TONGUE_MIDDLE + TONGUE_LAST
    for tables in zip(MEOWS, PITCH, mouths, HOLLOW, tongues, TONE):
        add(cat, *meow(*tables))
    for source, table in ((thud, THUDS), (scuff, SCUFFS), (puff, PUFFS), (rattle, RATTLES), (tick, TICKS)):
        for row in table:
            add(near, *source(*row))
    add(near, *wall_rub())
    add(near, *claw_squeak())
    for row in CAWS:
        add(crows, *caw(*row))
    add(crows, *bird())
    echoes = yard(boost(-23.0) * cat + boost(-3.5) * coloured(crows, CROW_WALLS))
    return (cat + crows + near + echoes + air)[None]


def low_pass(x):
    return signal.sosfilt(signal.butter(12, 16960, fs=SR, output="sos"), x)


def record(dry):
    edge = signal.firwin(401, 15720, window=("kaiser", 9), fs=SR)
    thin = signal.sosfilt(signal.butter(3, 50, "high", fs=SR, output="sos"), dry)
    mix = signal.oaconvolve(thin, edge[None], "same")
    return low_pass(mix)


dry = scene()
out = record(dry)
master_out(out)
```